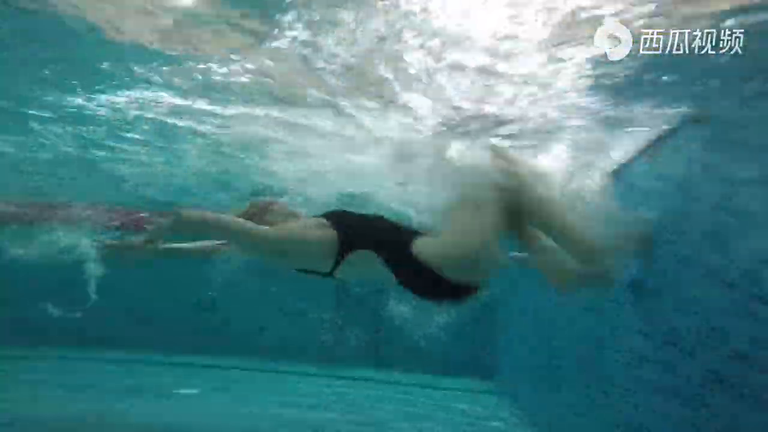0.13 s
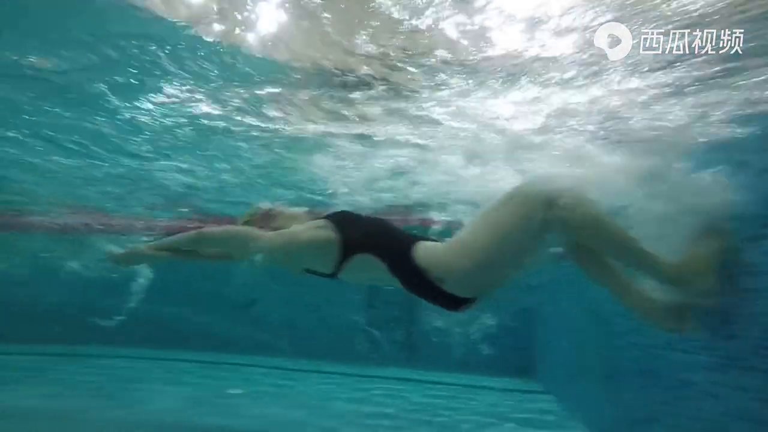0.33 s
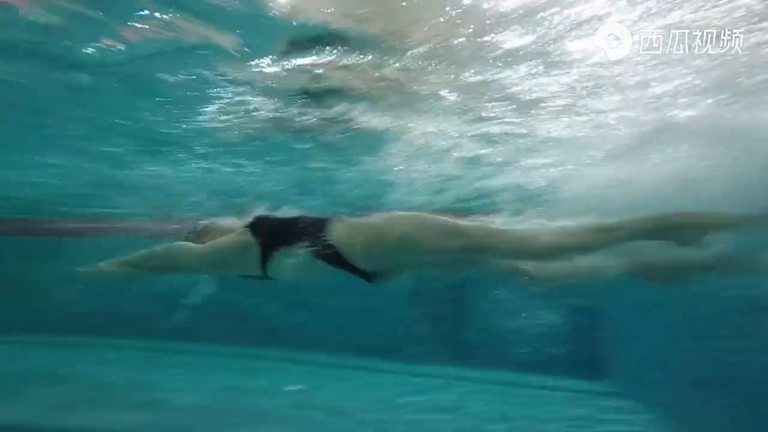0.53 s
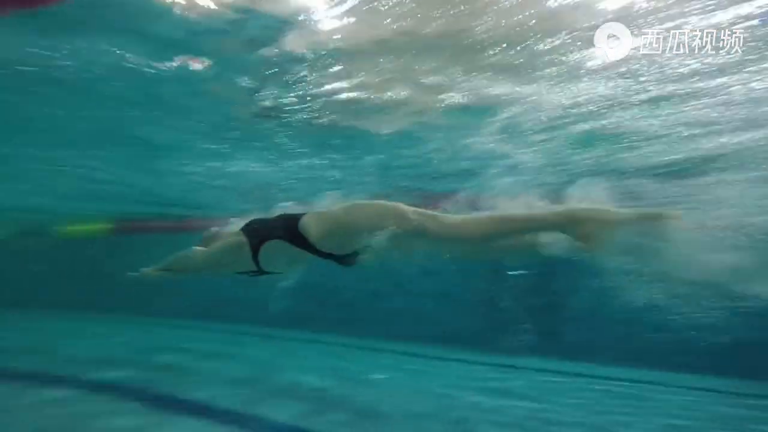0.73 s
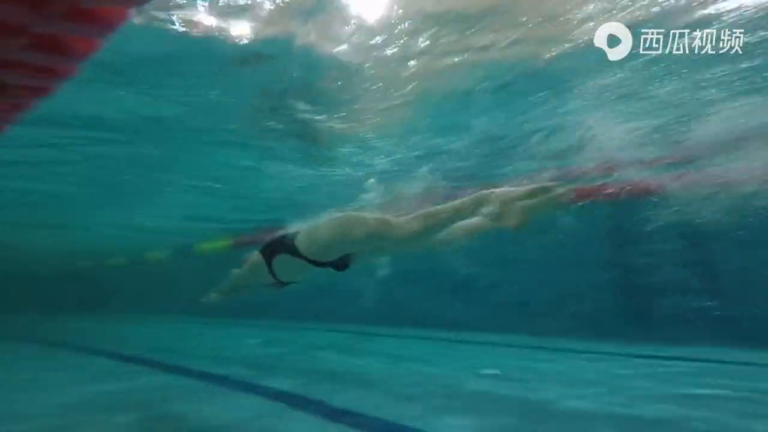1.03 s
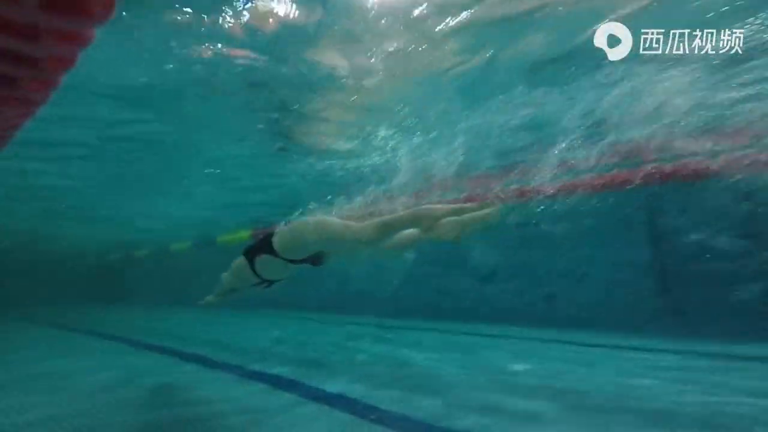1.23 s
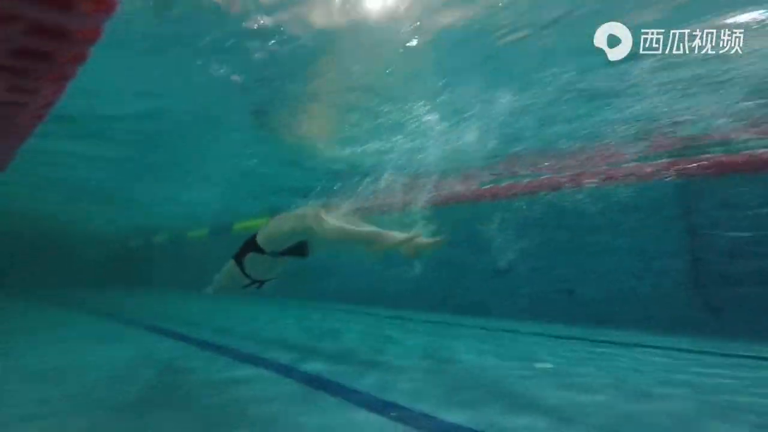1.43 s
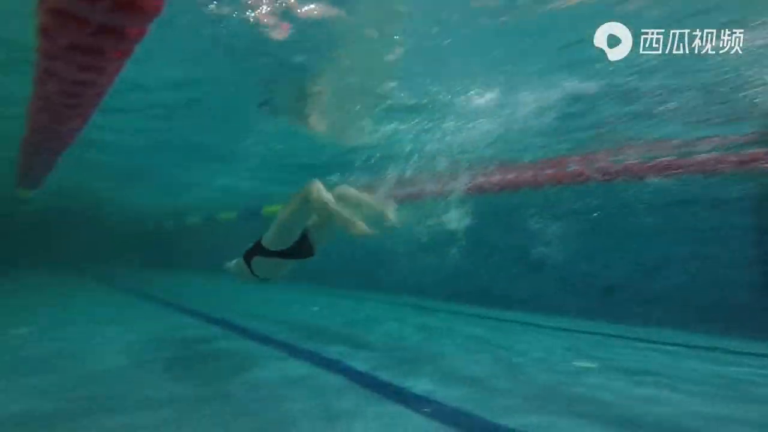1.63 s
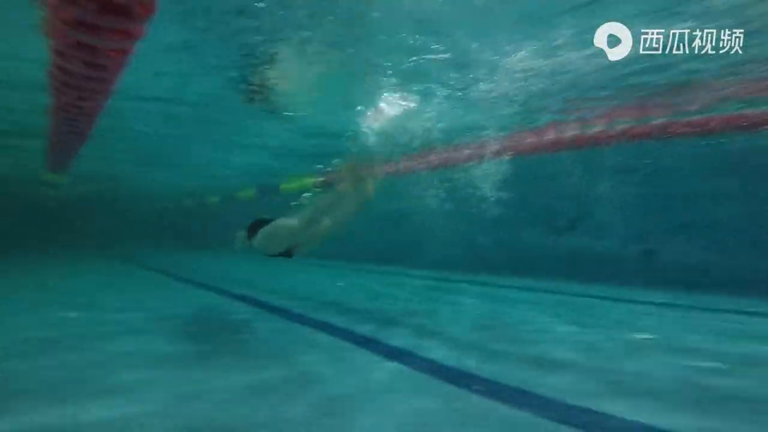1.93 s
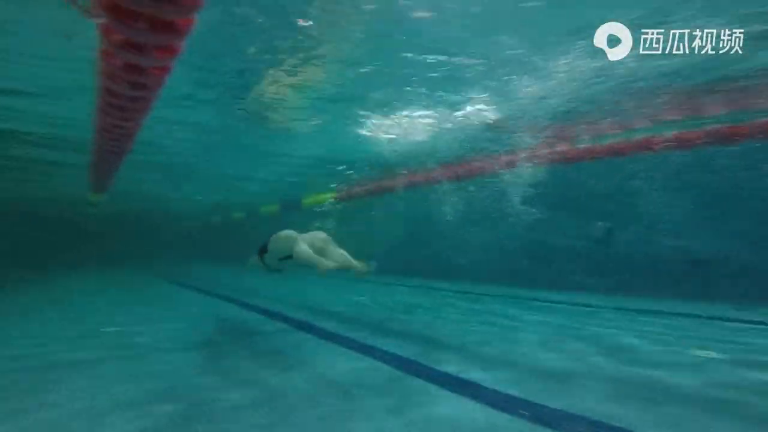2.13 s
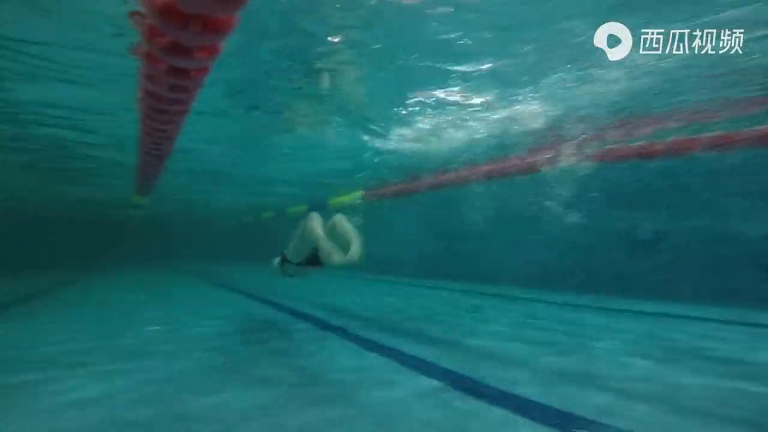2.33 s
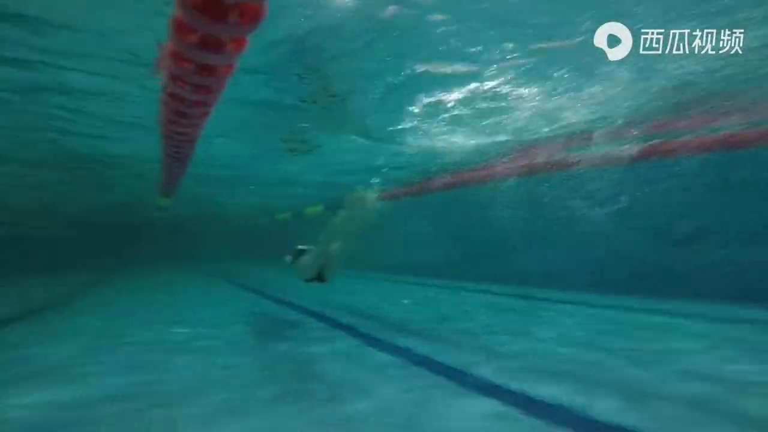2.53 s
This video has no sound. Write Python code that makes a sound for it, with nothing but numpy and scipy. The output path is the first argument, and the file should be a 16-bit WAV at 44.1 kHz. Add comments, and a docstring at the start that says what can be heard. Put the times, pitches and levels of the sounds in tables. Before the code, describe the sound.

Muffled bubbles gulp and gurgle underwater over a low rumble as a swimmer kicks away.

```python
"""Under water in a swimming pool, a swimmer pushes off the wall and kicks away.
First, big pockets of air wobble, gulp and thump in the churned water, each a gas spring loaded
by the water around it. After a lull, a cloud of smaller, higher bubbles gurgles in the wake.
Throughout, the pool adds a short reverberation and water sways against the camera case,
which muffles all but a faint fizz and a few ticks."""
import sys
import numpy as np
from scipy import signal
from scipy.fft import rfft, irfft
from scipy.io import wavfile
from scipy.ndimage import uniform_filter1d

SR = 44100
rng = np.random.default_rng(int(sys.argv[2]) if len(sys.argv) > 2 else 0)


def wrap_up_sound(samples):
    """Save the sound to the file named by the first command line argument, as 16-bit audio."""
    columns = np.atleast_2d(samples).T
    # keep every value between -1 and 1, then stretch to whole-number steps
    tamed = np.clip(columns, -1, 1)
    steps = np.round(tamed * 32767).astype(np.int16)
    wavfile.write(sys.argv[1], SR, steps)


N = 119070
TIME = np.arange(N) / SR

# envelope of the fizz and its stray pings: time_s, relative_level_db
FIZZ_LEVELS = [(0, -78), (.19, -72.5), (.29, -81), (.4, -76.5), (.48, -70), (.56, -80), (.88, -75),
               (1.3, -71.5), (1.65, -66.5), (2.12, -68.5), (2.45, -67), (2.7, -69)]


def bubble(hz, swell_s, phase, overtone=0):
    """Damped resonance: a bubble swells and rings out, rising in pitch; a violent one adds its octave."""
    age = np.arange(int(10 * swell_s * SR)) / (swell_s * SR)   # in swell times
    pitch_hz = hz * (1 + 0.041 * (age - 1) / 2)
    angle = 2 * np.pi * np.cumsum(pitch_hz) / SR + phase
    return age * np.exp(1 - age) * (np.cos(angle) + overtone * np.cos(2 * angle))


def swarm(spectrum, count, swell_cycles, spread_db, even_s, edge_hz):
    """Incoherent superposition: bubbles of random pitch and phase, evened out to unit power."""
    out = np.zeros(N)
    low_hz, high_hz = spectrum[0][0], spectrum[-1][0]
    for k, (jitter, height, strength, turn) in enumerate(rng.random((count, 4))):
        hz = low_hz * (high_hz / low_hz) ** height
        gain = from_db(at_hz(spectrum, hz) + spread_db * min(-np.log(1 - strength), np.pi))
        peak_s, swell_s = (k + jitter) / count * N / SR, swell_cycles / hz
        add(out, peak_s - swell_s, gain * bubble(hz, swell_s, 2 * np.pi * turn))
    out = muffle(out, edge_hz, order=6)
    window = int(even_s * SR) + 1
    power = uniform_filter1d(uniform_filter1d(out ** 2, window), window)
    return out / np.sqrt(np.abs(power) + 1e-12)


def wake():
    """Resonant pitch varies inversely with radius: five bubble sizes, from deep churn to light trickle."""
    # bubble strength in each size class: pitch_hz, relative_level_db
    churn_spectrum = [(65, -7), (90, -3), (125, 1), (170, -7.5)]
    tumble_spectrum = [(185, -4), (245, 0.5), (290, -3.5), (340, -1.5)]
    gurgle_spectrum = [(340, -7.5), (395, -0.5), (425, 3), (455, 1.5), (485, -5.5)]
    burble_spectrum = [(490, 0), (550, 2.5), (580, -5.5), (605, -3), (660, -11.5)]
    trickle_spectrum = [(660, 3.5), (760, 5), (830, -3.5), (900, -0.5), (970, 0.5), (1070, -3),
                        (1200, -7.5), (1320, -19), (1700, -11), (2000, -25.5)]
    # envelope of each size class: time_s, relative_level_db
    churn_levels = [(0, -40), (.15, -25.5), (.29, -35), (.39, -29), (.62, -39.5), (.76, -33.5),
                    (.83, -41.5), (.9, -43.5), (1.0, -35.5), (1.15, -52), (1.29, -54), (1.38, -35.5),
                    (1.44, -42.5), (1.62, -37), (1.72, -35.5), (1.93, -50), (2.14, -52), (2.39, -43),
                    (2.48, -50), (2.63, -34.5), (2.7, -41.5)]
    tumble_levels = [(0, -27.5), (.19, -30), (.3, -36.5), (.35, -31), (.42, -30.5), (.5, -25.5),
                     (.56, -31.5), (.77, -31.5), (.9, -49.5), (.97, -34.5), (1.12, -50.5), (1.29, -48.5),
                     (1.38, -26), (1.44, -58), (1.52, -43.5), (1.85, -47), (2.3, -45), (2.7, -63)]
    gurgle_levels = [(0, -42), (.28, -46.5), (.48, -38), (.56, -48), (.72, -48), (.85, -61.5), (.97, -53),
                     (1.16, -52), (1.32, -43.5), (1.37, -33), (1.43, -43.5), (1.8, -40.5), (1.94, -43),
                     (2.0, -32.5), (2.16, -28.5), (2.34, -36.5), (2.51, -41.5), (2.59, -32.5), (2.7, -46)]
    burble_levels = [(0, -52), (.3, -50.5), (.42, -48), (.68, -49.5), (.87, -55.5), (.96, -45.5),
                     (1.28, -46), (1.37, -34.5), (1.44, -42.5), (1.66, -49.5), (1.79, -36.5), (1.88, -46.5),
                     (2.14, -28.5), (2.21, -35), (2.35, -42.5), (2.45, -41), (2.52, -43), (2.61, -36),
                     (2.7, -55)]
    trickle_levels = [(0, -53.5), (.3, -57), (.44, -53.5), (.85, -57.5), (1.0, -52.5), (1.1, -54.5),
                      (1.31, -56), (1.42, -46.5), (1.62, -49), (1.95, -50.5), (2.15, -49), (2.45, -47.5),
                      (2.7, -51.5)]
    churn = swarm(churn_spectrum, count=260, swell_cycles=0.77, spread_db=-1, even_s=0.12, edge_hz=275)
    tumble = swarm(tumble_spectrum, count=400, swell_cycles=1.668, spread_db=1.5, even_s=.05, edge_hz=385)
    gurgle = swarm(gurgle_spectrum, count=500, swell_cycles=2.814, spread_db=1.5,
                   even_s=0.028, edge_hz=830)
    burble = swarm(burble_spectrum, count=500, swell_cycles=3.144, spread_db=1, even_s=0.15, edge_hz=920)
    trickle = swarm(trickle_spectrum, count=1600, swell_cycles=2.8, spread_db=3, even_s=.14, edge_hz=2600)
    return (from_db(0.5) * level(churn_levels) * churn
            + from_db(-3) * level(tumble_levels) * tumble
            + from_db(-1.5) * level(gurgle_levels) * gurgle
            + from_db(-2.5) * level(burble_levels) * burble
            + from_db(-2) * level(trickle_levels) * trickle)


def gulps():
    """Free oscillation: large bubbles break loose and ring, their wobbling surfaces modulating the tone."""
    # single bubbles: start_s, pitch_hz, relative_peak_db, swell_s
    releases = [(0.141, 251.6, -19, 0.0067), (0.177, 252.3, -17, 0.0055), (0.242, 270, -18.5, 0.0038),
                (0.242, 510, -38, 0.0064), (0.337, 281, -24, 0.0088), (0.352, 536, -31.5, .005),
                (0.471, 283.8, -17.5, 0.015), (0.493, 215, -27, .009), (0.956, 251.5, -36, 0.0076),
                (1.030, 652, -41, 0.0064), (1.345, 386, -28.5, 0.0054), (1.410, 1147, -43.5, 0.0051),
                (1.478, 209, -24.5, 0.0067), (1.554, 1026, -40, 0.006), (1.559, 214, -27, 0.0067),
                (1.563, 596, -29.5, 0.0093), (1.645, 150.2, -23.5, 0.022), (1.682, 1040, -37.5, 0.0039),
                (1.700, 895, -39.5, 0.0041), (1.754, 143.1, -26.5, 0.023), (1.922, 540, -27.5, 0.0065),
                (1.985, 413, -30, 0.016), (2.050, 412, -28.5, 0.018), (2.119, 556.6, -25, 0.018),
                (2.160, 409, -31, 0.015), (2.339, 715, -37.5, 0.011), (2.373, 441, -24.5, 0.0088),
                (2.409, 526, -20, 0.0086), (2.452, 579, -26.5, 0.006), (2.545, 374.8, -27.5, 0.023)]
    out = np.zeros(N)
    for (start_s, hz, db, swell_s), turn in zip(releases, rng.random(len(releases))):
        add(out, start_s, from_db(db - 2.5) * bubble(hz, swell_s, 2 * np.pi * turn))
    wobble = rms_one(muffle(rng.standard_normal(N), edge_hz=97))
    return muffle(out * (1 + 0.31 * wobble), edge_hz=2200)


def thumps():
    """Nonlinear oscillation: an air cavity collapses, rebounds and shoves out a puff of water."""
    # collapsing cavities: start_s, pitch_hz, fundamental_peak_db, swell_s
    collapses = [(0.109, 116, -25, 0.0096), (0.142, 116, -22, 0.0049), (0.17, 109, -25, 0.0064),
                 (0.196, 45.7, -19, 0.0087), (0.374, 114.4, -21.5, 0.0093), (0.743, 163.6, -27, 0.0041),
                 (0.765, 120, -42, 0.0051), (0.842, 128.4, -20, 0.0056), (1.374, 121.5, -27.5, 0.0056),
                 (1.473, 122.7, -23, 0.0064), (1.52, 115, -19.5, 0.0022), (1.556, 113.5, -17.5, 0.0059),
                 (1.623, 104.5, -24.5, .009), (2.192, 74, -27, 0.008), (2.372, 79.8, -30, 0.0079),
                 (2.601, 58.5, -22.5, 0.0042)]
    out = np.zeros(N)
    puff = 0.23 * rms_one(muffle(rng.standard_normal(N), edge_hz=330, order=6))
    for (start_s, hz, db, swell_s), turn in zip(collapses, rng.random(len(collapses))):
        add(out, start_s, from_db(db) * bubble(hz, swell_s, 2 * np.pi * turn, overtone=0.42))
        age = np.clip((TIME - start_s) / swell_s, 0, 20)
        out += from_db(db) * age * np.exp(1 - age) * puff
    return muffle(out, edge_hz=770)


def pool(x, t60_s):
    """Reverberation: reflections from walls, floor and surface merge into an exponential tail."""
    t = TIME[:SR // 2]
    tail = rng.standard_normal(len(t)) * from_db(-60 * t / t60_s) * (t > .006)
    return signal.fftconvolve(x, tail / np.sqrt(np.sum(tail ** 2)))[:N]


def sway():
    """Hydrodynamic pressure: moving water pushes slowly on the case, making a low rumble."""
    # pressure spectrum: frequency_hz, relative_level_db
    spectrum = [(10, -6.5), (18, 7), (33, -6.5), (55, -8.5), (90, -24), (200, -36), (600, -73)]
    return from_db(-34.5) * coloured(rng.standard_normal(N), spectrum)


def ticks(ring_t60_s, snap_decay_s):
    """Impulse response: a tiny bubble pops on the case with a brief ring and an octave-wide snap."""
    # pops: start_s, pitch_hz, ring_db, relative_snap_db
    pops = [(0.030, 3640, -58.5, -68), (0.348, 2620, -67, -65), (0.641, 3440, -54, -65),
            (0.671, 2530, -57, -60.5), (0.726, 4740, -60, -63), (0.728, 1410, -49, -66),
            (0.759, 1460, -55, -68), (1.418, 7550, -56, -57), (1.570, 3060, -47, -65),
            (1.715, 1830, -45, -57), (2.030, 1710, -48, -65), (1.884, 8800, -50, -55),
            (2.156, 7020, -43, -57), (2.194, 8700, -60, -56), (2.394, 8600, -67, -49),
            (2.596, 5870, -54, -52)]
    out, t = np.zeros(N), TIME[:SR // 10]
    for start_s, hz, ring_db, snap_db in pops:
        ring = np.sin(2 * np.pi * hz * t) * from_db(-60 * t / ring_t60_s)
        band = signal.butter(2, [hz / np.sqrt(2), hz * np.sqrt(2)], "band", fs=SR, output="sos")
        snap = rms_one(signal.sosfilt(band, rng.standard_normal(len(t)))) * np.exp(-t / snap_decay_s)
        add(out, start_s, from_db(ring_db) * ring + from_db(snap_db - 3.5) * snap)
    return muffle(out, edge_hz=8800)


def foam():
    """Filtered shot noise: the finest bubbles fizz and hiss faintly through the case."""
    # spectra of the fizz and the higher hiss: frequency_hz, relative_level_db
    fizz_spectrum = [(900, 1), (1700, 8), (2200, 1), (3000, 3.5), (3500, -5), (4400, -2.5), (5100, -8.5),
                     (5900, -2), (6400, -7), (7000, -7), (8200, -7.5), (14000, -30)]
    hiss_spectrum = [(2000, -22.5), (6500, -9), (7700, -6.5), (8700, 1.5), (10000, -2.5), (11500, -13),
                     (14000, -23)]
    # envelope of the hiss: time_s, relative_level_db
    hiss_levels = [(0, -72.5), (.2, -74), (.28, -79), (.4, -76), (.48, -72), (.58, -77), (1.0, -84),
                   (1.4, -83), (1.8, -75), (2.13, -79), (2.42, -76.5), (2.7, -78.5)]
    fizz = coloured(crackle(per_s=3200, spread_db=3.0, smooth_ratio=1.3), fizz_spectrum)
    hiss = coloured(crackle(per_s=5400, spread_db=9.5, smooth_ratio=2.2), hiss_spectrum)
    return from_db(0.8) * (level(FIZZ_LEVELS) * fizz + level(hiss_levels) * hiss)


def crackle(per_s, spread_db, smooth_ratio):
    """Shot noise: independent tiny pops over a smooth hiss."""
    strengths = from_db(spread_db * np.minimum(rng.exponential(1, N), 5)) * rng.choice([-1, 1], N)
    pops = rms_one(strengths * (rng.random(N) < per_s / SR))
    return pops + smooth_ratio * rng.standard_normal(N)


def prickle(count, low_hz, high_hz, t60_s):
    """Damped resonance: stray tiny bubbles ping a little louder than the fizz."""
    out, t = np.zeros(N), TIME[:SR // 40]
    for when, height, strength in rng.random((count, 3)):
        hz = low_hz + height * (high_hz - low_hz)
        excess_db = 6 + 2 * min(-np.log(1 - strength), np.pi)
        add(out, when * N / SR, from_db(excess_db - 60 * t / t60_s) * np.sin(2 * np.pi * hz * t))
    return out * level(FIZZ_LEVELS)


def from_db(db):
    """Amplitude ratio: tenfold for every 20 decibels."""
    return 10 ** (np.asarray(db) / 20)


def rms_one(x):
    """Normalisation to unit power."""
    return x / np.sqrt(np.mean(x ** 2) + 1e-20)


def level(rows):
    """Amplitude envelope, interpolated in decibels."""
    return from_db(np.interp(TIME, *np.transpose(rows)))


def at_hz(spectrum, hz):
    """Spectral level in decibels, interpolated in log frequency."""
    points_hz, db = np.transpose(spectrum)
    return np.interp(np.log(hz), np.log(points_hz), db)


def add(out, start_s, sound):
    """Superposition of one sound at its start time."""
    onset = int(start_s * SR)
    first, end = max(onset, 0), min(onset + len(sound), N)
    if end > first:
        out[first:end] += sound[first - onset:end - onset]


def muffle(x, edge_hz, order=4):
    """Low-pass filtering with a flat passband."""
    return signal.sosfilt(signal.butter(order, min(edge_hz, .45 * SR), fs=SR, output="sos"), x)


def coloured(x, spectrum):
    """Spectral shaping of a noise, at unit power."""
    hz = np.maximum(np.arange(N // 2 + 1) * SR / N, 1)
    return rms_one(irfft(rfft(x) * from_db(at_hz(spectrum, hz)), N))


def scene():
    """Superposition in one channel: reverberant bubbles in the pool, dry sounds at the case."""
    bubbles = wake() + gulps() + thumps()
    mix = bubbles + from_db(-16) * pool(bubbles, t60_s=0.38) + sway() + foam()
    mix += prickle(count=70, low_hz=3540, high_hz=10650, t60_s=.006)
    mix += ticks(ring_t60_s=0.012, snap_decay_s=.003)
    return mix[None]


def record(dry):
    """Soft saturation rounds the peaks; a steep low-pass cuts the highest treble."""
    ceiling, cutoff_hz = 0.28, 14200
    rounded = ceiling * np.tanh(dry / ceiling)
    return signal.sosfilt(signal.ellip(10, .2, 80, cutoff_hz, fs=SR, output="sos"), rounded)


dry = scene()
out = record(dry)
wrap_up_sound(out)
```